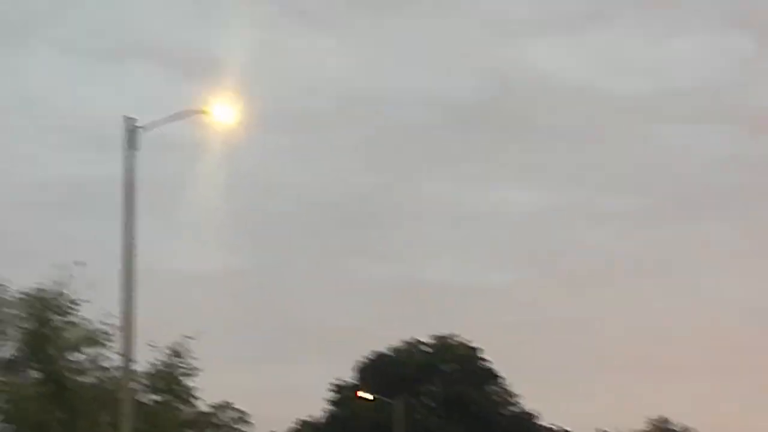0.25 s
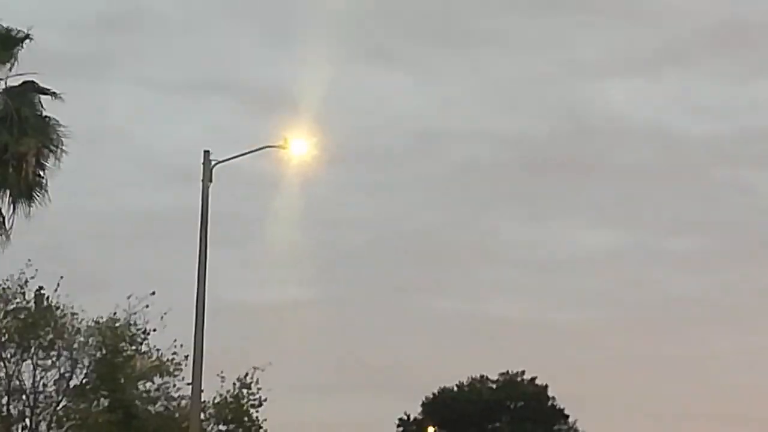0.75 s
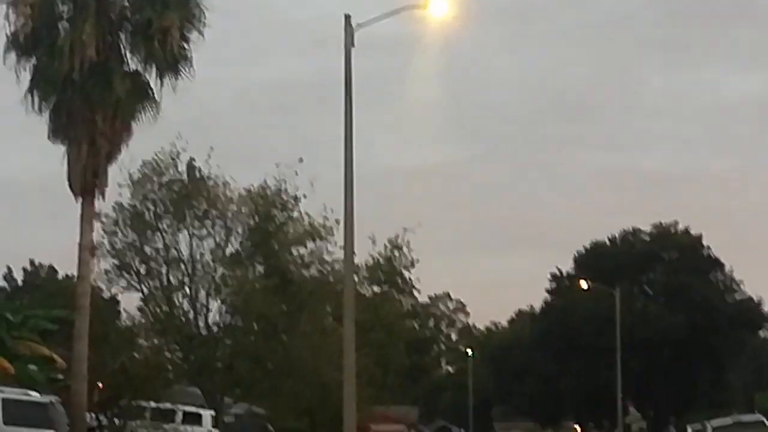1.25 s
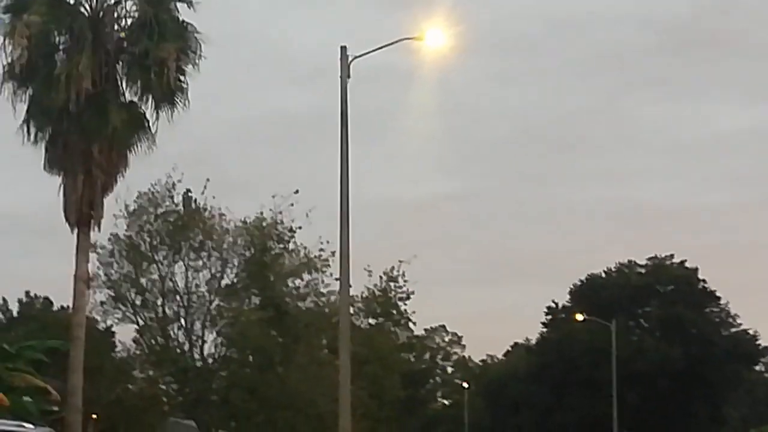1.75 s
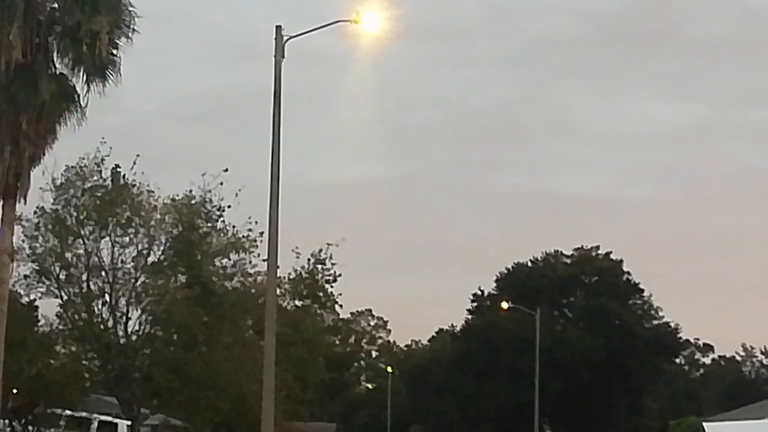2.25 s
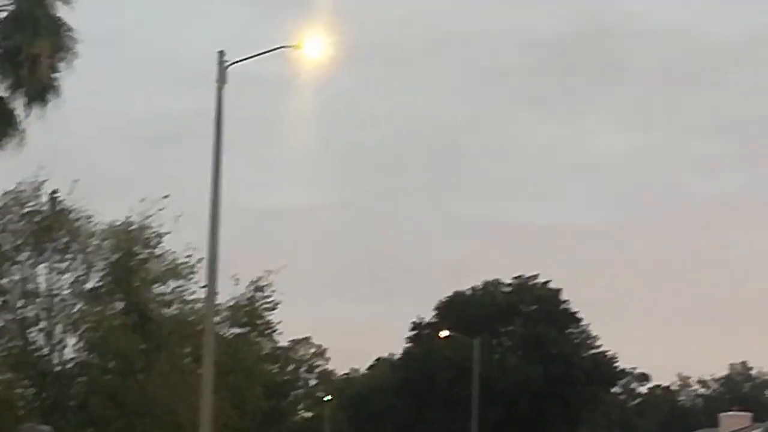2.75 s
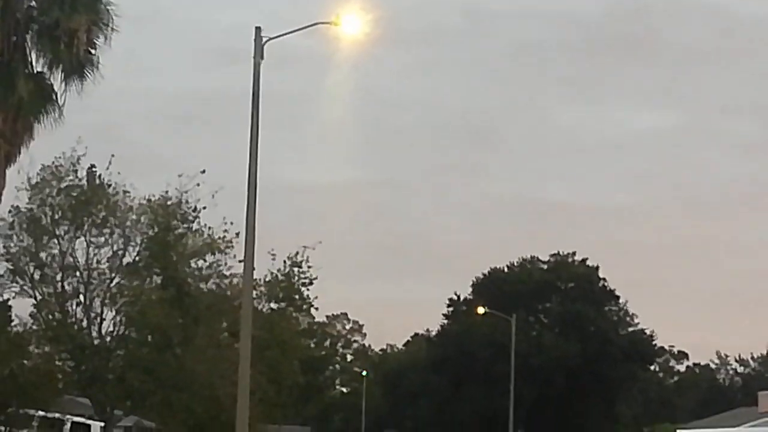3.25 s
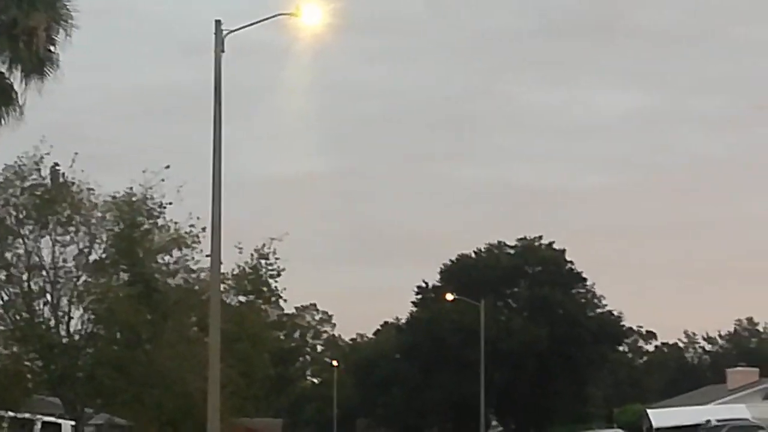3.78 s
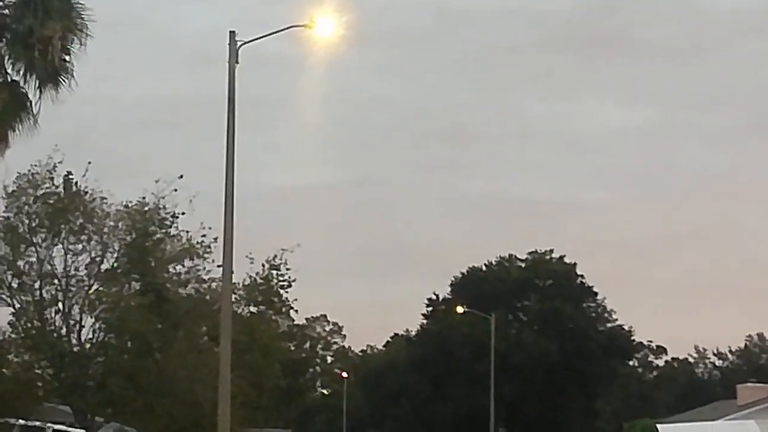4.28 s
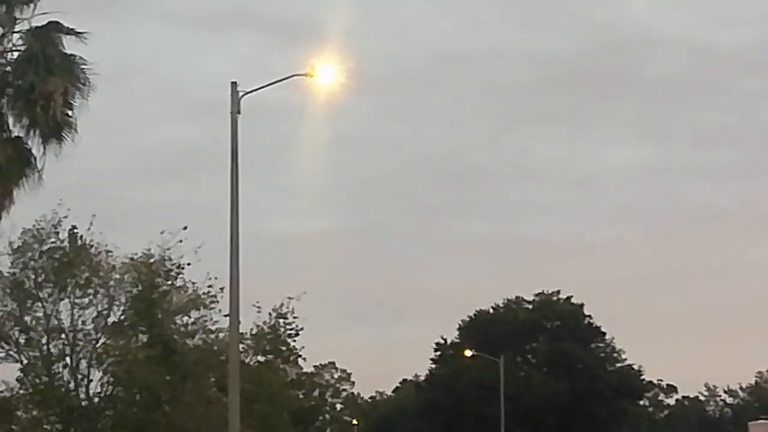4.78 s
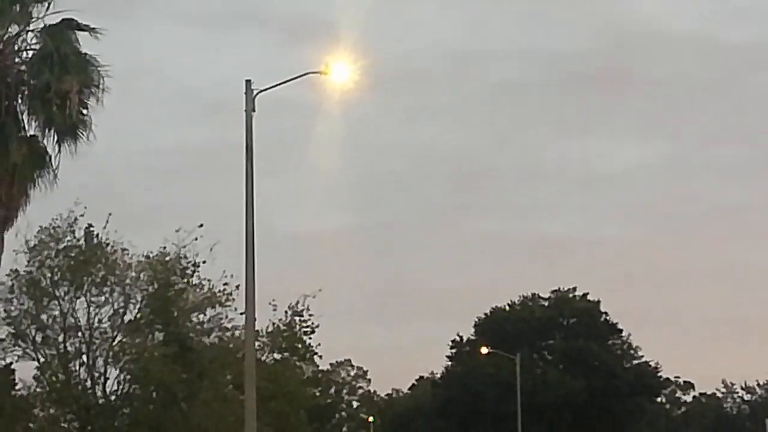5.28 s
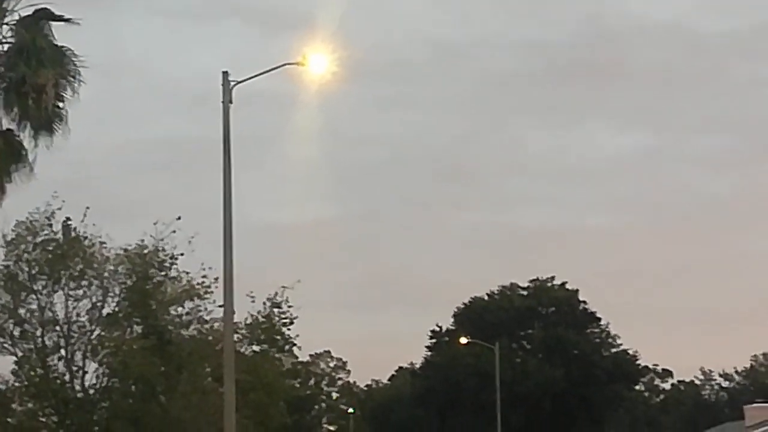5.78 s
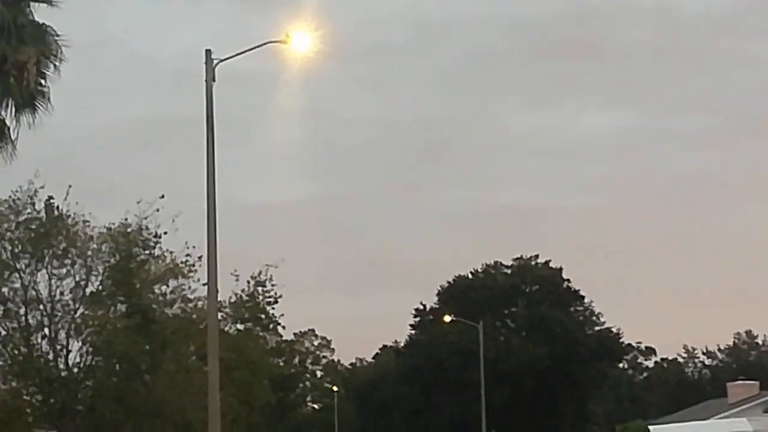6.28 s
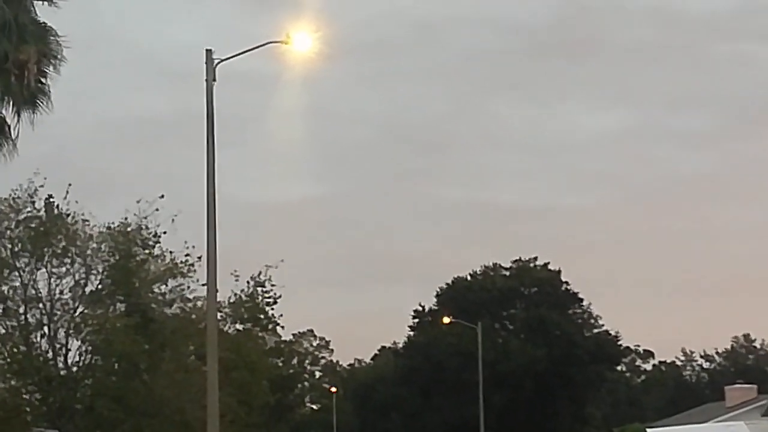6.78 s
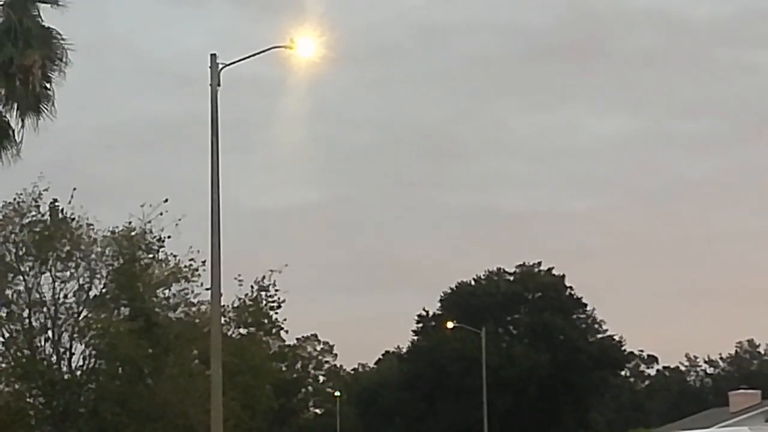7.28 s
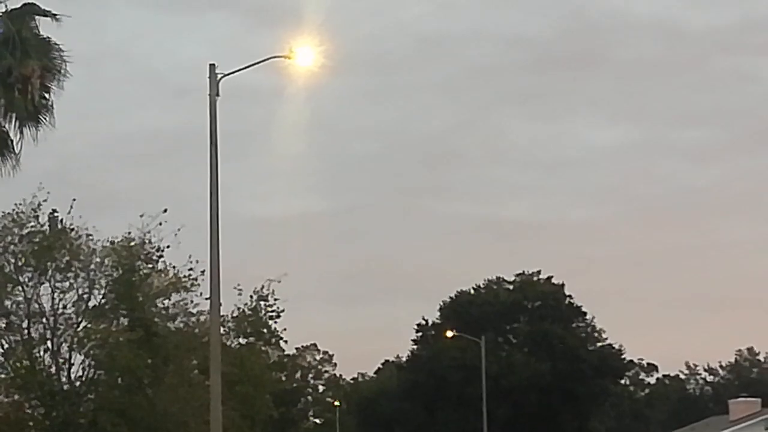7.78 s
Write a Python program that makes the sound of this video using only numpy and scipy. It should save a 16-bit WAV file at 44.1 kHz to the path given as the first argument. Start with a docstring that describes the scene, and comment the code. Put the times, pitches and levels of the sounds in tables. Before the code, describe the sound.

Overlapping raspy, whistling bird screeches come in bursts outdoors, with pauses of low traffic rumble, soft microphone thumps, and a faint sinking squeal.

```python
"""Several birds screech over one another from the trees of a quiet street at dawn, in three bouts.
Each call flicks up, then sags from whistle to rasp: syrinx harmonics and half-harmonics, then noisy bands.
Hoarse rasps of filtered noise lie beneath; scattered and single delayed echoes come from trees and houses.
Far off, shaped noise makes traffic hum, and a wavering tone with faint partials squeals.
The hand-held camera creaks as uneven slips ring its case, and bumps as bursts of low noise."""
import sys
import numpy as np
from scipy import signal
from scipy.fft import rfft, irfft, next_fast_len
from scipy.io import wavfile

SR = 44100
rng = np.random.default_rng(int(sys.argv[2]) if len(sys.argv) > 2 else 0)


def master(y):
    """Save y as 16-bit WAV."""
    cut = np.clip(np.atleast_2d(y).T, -1, 1)
    pcm = np.round(cut * 32767)  # scale
    wavfile.write(sys.argv[1], SR, pcm.astype(np.int16))


N = 354556  # length of the scene in samples
HZ = np.fft.rfftfreq(N, 1 / SR)

# the pitch flicks up to its top: duration in s, depth in log pitch
FLICK_S, FLICK_DEPTH = 0.04, 0.13
WHISTLE_RISE_DB_PER_S, OVERTONE_FADE_DB_PER_S = 83, 49
# the rasp is an arch: peak as a share of the call, and how far its level differs at start and end
RASP_PEAK, RASP_START_DB, RASP_END_DB = 0.53, -10.5, -7.5
# jitter as shares of the pitch: the voice frays toward its end
JITTER_SLOW, JITTER_FAST, JITTER_GROWTH = 0.00296, 0.0038, 0.0088
ATTACK_S, ATTACK_DB = 0.029, -10  # each call starts softly and opens up
# the birds sit close together to the left, so the left microphone hears them first
BIRD_LEAD_MS, PERCH_SPREAD_MS = 0.52, 0.015
# resonance of throat and beak, relative: frequency_hz, level_db
THROAT_RESPONSE = [(700, -30), (1600, -10.5), (2300, 3), (3100, 20), (4200, 13), (5100, 10), (6600, 2),
                   (7900, -9.5), (8800, -12), (10000, -20.5), (13000, -41.5), (16000, -53)]
# spectrum of the rasp, relative: frequency_hz, level_db
RASP_COLOUR = [(600, -22.5), (1500, -14), (2300, -1.5), (3000, 11.5), (3900, 12), (5000, 2.5), (7000, 1.5),
               (8100, -3), (8800, -5.5), (10000, -28), (13000, -23), (16000, -48)]


def screech(start, length, top_hz, sag, settle_s, whistle_db, peak_s, fade_db_per_s,
            overtones_db, rasp_db, half_db, pan_db,
            flutter_db=1.5, bright_db=-3, throb_db=0.3, hiss=0.55, swell_db=4.5,
            whistle_flutter_db=3.0, skirt_hz=150):
    """Subharmonic voicing: strong and weak syrinx cycles give lines with ragged skirts, over a little hiss."""
    t = sample_times(length)
    n, age = len(t), t / length

    # pitch
    flick = FLICK_DEPTH * np.maximum(1 - t / FLICK_S, 0) ** 2
    droop = sag * settle_s * (1 - np.exp(-np.maximum(t - FLICK_S, 0) / settle_s))
    hz = top_hz * np.exp(-flick - droop)
    jitter = JITTER_SLOW * wander(n, 45.5) + (JITTER_FAST + JITTER_GROWTH * age) * wander(n, 410)
    phase = 2 * np.pi * np.cumsum(hz * (1 + jitter)) / SR

    # levels
    below_peak_db = np.maximum(WHISTLE_RISE_DB_PER_S * (peak_s - t), fade_db_per_s * (t - peak_s))
    whistle_gain = amp(whistle_db - below_peak_db)
    overtone_gain = amp(overtones_db - OVERTONE_FADE_DB_PER_S * t)
    before_peak = np.maximum(1 - age / RASP_PEAK, 0)
    after_peak = np.maximum(age - RASP_PEAK, 0) / (1 - RASP_PEAK)
    rasp_gain = amp(rasp_db + RASP_START_DB * before_peak ** 2 + RASP_END_DB * after_peak ** 2)
    attack = amp(ATTACK_DB * np.maximum(1 - t / ATTACK_S, 0))

    def weight(k):
        """Period doubling: weak cycles add lines halfway between the harmonics."""
        return amp(half_db * (k % 1 > 0))

    def line(k):
        """Source and filter: the throat response sets the level of one line, which also flutters."""
        throat_db = read(THROAT_RESPONSE, k * hz)
        return weight(k) * amp(throat_db + flutter_db * wander(n, 52)) * np.sin(k * phase)

    def skirt(k):
        """Random modulation: irregular cycles spread a line into a band some hundred hertz wide."""
        in_step = wander(n, skirt_hz) * np.sin(k * phase)
        quarter_ahead = wander(n, skirt_hz) * np.cos(k * phase)
        return weight(k) * (in_step + quarter_ahead)

    orders = np.arange(2, 17) / 2  # multiples of the pitch: 1, 1.5, 2 ... 8
    # each overtone swells and fades slowly at random
    upper = unit(sum(line(k) * amp(swell_db * wander(n, 14)) for k in orders if k != 2))
    # the whistle is the strong second harmonic
    second = unit(amp(whistle_flutter_db * wander(n, 50)) * np.sin(2 * phase))
    # a harder push brightens the overtones along with the rasp
    voiced = whistle_gain * second + np.hypot(overtone_gain, amp(bright_db) * rasp_gain) * upper
    skirts = unit(sum(skirt(k) for k in orders))
    harsh = rasp_gain * colour(skirts + hiss * noise(n), RASP_COLOUR)

    throb = unit(amp(throb_db * wander(n, 120)))
    call = (voiced + harsh) * throb * attack * fade(t, 0.0046, 0.023)
    lead_ms = BIRD_LEAD_MS + PERCH_SPREAD_MS * rng.standard_normal()
    return start, place(call, lead_ms, pan_db)


HOARSE_RISE_S, HOARSE_FALL_S, HOARSE_FADE_DB_PER_S = 0.054, 0.064, 6.5
# spectrum of the toneless rasp, relative: frequency_hz, level_db
HOARSE_SPECTRUM = [(250, -3.5), (500, 1), (900, 3.5), (1300, 5), (1700, 10), (2200, 11), (2800, 10.5),
                   (4500, -60), (11000, -57)]


def hoarse(start, length, db):
    """Filtered turbulence: a toneless, grainy rasp starts quickly and slowly weakens."""
    t = sample_times(length)
    grain = noise(len(t)) * amp(0.6 * wander(len(t), 150))
    level = amp(db - HOARSE_FADE_DB_PER_S * t) * fade(t, HOARSE_RISE_S, HOARSE_FALL_S)
    return start, place(level * colour(grain, HOARSE_SPECTRUM), 0.1, 0)


# reverberation time of the street: frequency_hz, t60_s
STREET_DECAY = [(300, 0.45), (3000, 1), (6000, 0.87), (12000, 0.04)]


def street(x, gap_s=0.01346):
    """Diffuse reverberation: sparse echoes from trees and houses decay, the treble dying first."""
    signs = rng.choice([-1., 1.], (2, SR))
    chosen = rng.random((2, SR)) < 2500 / SR  # about 2500 echoes per second
    taps = signs * chosen * (np.arange(SR) > gap_s * SR)
    hz, t, bands = signal.stft(taps, SR, nperseg=256)
    decay = amp(-60 * t / read(STREET_DECAY, hz)[:, None])
    tail = signal.istft(bands * decay, SR, nperseg=256)[1]
    return signal.fftconvolve(x, tail / np.linalg.norm(tail[0]), axes=1)[:, :N]


# one row a call; the pitch is the fundamental, and the whistle sounds an octave above it:
# start_s, length_s, top_pitch_hz, sag_log_pitch_per_s, sag_settling_s,
# whistle_db, whistle_peak_s (after the start), whistle_fade_db_per_s,
# overtones_db, rasp_db, half_pitch_lines_db (relative), left_minus_right_db (before the microphone balance)
SCREECH_CALLS = [(-0.145, 0.31, 1831, 1.02, 0.59, -38, 0.083, 49, -52, -41.5, -7.5, 1),
                 (-0.037, 0.39, 1710, 0.3, 0.42, -43, 0.06, 71, -55, -50.5, -0.5, 2.5),
                 (0.423, 0.4, 1717, 0.9, 0.32, -37, 0.18, 32, -39, -38.5, -15.5, 6),
                 (0.621, 0.44, 1702, 0.55, 0.59, -35, 0.09, 76, -52, -42.5, -3.5, 3.5),
                 (1.139, 0.48, 1680, 1.23, 0.32, -37, 0.18, 67, -42.5, -40, -9.5, 5),
                 (1.437, 0.43, 1747, 0.58, 0.51, -32, 0.055, 40, -45, -47.5, -6.5, 9.5),
                 (1.628, 0.34, 2042, 0.73, 0.59, -42, 0.084, 56, -64, -42.5, 2.5, 3.5),
                 (1.748, 0.46, 1642, 0.71, 0.49, -36.5, 0.11, 33, -48, -43.5, -5, 7),
                 (2.094, 0.56, 1708, 0.75, 0.68, -33, 0.036, 72, -58, -48.5, -3, 5),
                 (2.46, 0.44, 1662, 1.01, 0.32, -43, 0.14, 59, -40.5, -45, -12.5, 2),
                 (2.696, 0.18, 1912, 0.76, 0.54, -39, 0.073, 43, -63, -44.5, -4, 21),
                 (3.282, 0.26, 1343, 0.77, 0.55, -62.5, 0.15, 49, -82, -75, 3, 0),
                 (4.028, 0.54, 1652, 0.36, 0.76, -39, 0.06, 9, -46.5, -43.5, -9, 6),
                 (4.306, 0.56, 1740, 0.94, 0.36, -41, 0.11, 30, -40, -40.5, -5, 3),
                 (4.635, 0.31, 1840, 0.045, 0.34, -37.5, 0.12, 54, -64, -50.5, -2, 8),
                 (4.892, 0.49, 1714, 0.76, 0.65, -33, 0.094, 61, -45.5, -46.5, -4.5, 5.5),
                 (5.162, 0.39, 1637, 0.65, 0.62, -47, 0.044, 42, -41, -40.5, -6, 4.5),
                 (5.319, 0.47, 1597, 0.57, 0.45, -41, 0.15, 60, -40, -41, -14, -1),
                 (5.634, 0.36, 1897, 0.96, 0.38, -38.5, 0.053, 43, -46, -56, -3.5, 4),
                 (6.509, 0.46, 1770, 1.04, 0.33, -39, 0.18, 59, -46, -46, -5, 3),
                 (6.751, 0.5, 1740, 0.68, 0.57, -34, 0.046, 48, -36, -42, -10.5, 4),
                 (6.863, 0.64, 1882, 0.95, 0.55, -36, 0.12, 24, -40.5, -42, -4.5, 3),
                 (7.053, 0.54, 1835, 0.97, 0.35, -34, 0.095, 30, -57, -40, -4.5, 7.5),
                 (7.442, 0.44, 1729, 0.75, 0.52, -32, 0.12, 72, -41, -44.5, -13, 8.5),
                 (7.639, 0.44, 1755, 0.73, 0.62, -32.5, 0.11, 41, -45, -42, -7, 7.5),
                 (7.747, 0.46, 1904, 1.1, 0.46, -37, 0.11, 50, -44, -50, -3, 10)]
# hoarse, low rasps under the calls: start_s, length_s, level_db
HOARSE_CALLS = [(1.689, 0.67, -52.5), (2.679, 0.26, -57.5), (4.242, 0.663, -53)]
# single echoes: delay_s, level_db (before walls_db is added)
WALL_ECHOES = [(0.022, -10), (0.049, -22), (0.082, -16.5), (.128, -17.5)]
# leaves and air colour the echoes: frequency_hz, gain_db
ECHO_BALANCE = [(1000, 2.5), (3200, 0.5), (4500, 2), (6500, 0.5), (10000, 1)]
# unequal response of the two microphone ports: frequency_hz, left_minus_right_db
PORT_BALANCE = [(100, 6), (700, -11), (1500, -7), (3200, -10), (4500, -7.5), (6000, 1.5), (7300, 5.5),
                (8500, 1), (15000, 19)]
# the case bends the treble on its way to the ports: frequency_hz, further_left_lead_rad
CASE_TURN = [(1500, 0), (2400, .6), (2850, -.4), (3220, 1.1), (3400, -.1), (3850, .1), (4100, -1),
             (4450, 0), (4720, -.5), (6000, 2), (6600, 3.2), (7200, 3.2), (7400, 1.3), (8000, 1),
             (8700, 2.1)]


def birds(scatter_db=-11, walls_db=-3.5):
    """Superposition: direct calls and rasps sum with their echoes, through two unlike microphone ports."""
    direct = np.zeros((2, N))
    for row in SCREECH_CALLS:
        add(direct, *screech(*row))
    for row in HOARSE_CALLS:
        add(direct, *hoarse(*row))

    echoes = amp(scatter_db) * street(direct)
    for delay, db in WALL_ECHOES:
        add(echoes, delay, amp(db + walls_db) * direct[::-1])  # left and right swap

    heard = rfft(direct) + rfft(echoes) * amp(read(ECHO_BALANCE, HZ))
    balance = amp(np.outer([0.5, -0.5], read(PORT_BALANCE, HZ)))
    balance = balance / np.sqrt(np.mean(balance ** 2, 0))
    turn = np.exp(1j * np.outer([0.5, -0.5], read(CASE_TURN, HZ)))
    return irfft(heard * turn * balance, N)


def squeal_tone(hz, waver, low_db, third_db=-32, fourth_db=-26, beating_db=4):
    """Additive synthesis: one strong line, an octave below and faint lines above, at rms 1."""
    n = len(hz)
    phase = np.pi * np.cumsum(hz * (1 + waver * wander(n, 128))) / SR  # phase of the octave below
    tone = np.sin(2 * phase) + amp(low_db) * np.sin(phase)
    tone += amp(third_db) * np.sin(3 * phase) + amp(fourth_db) * np.sin(4 * phase)
    # an unsteady pitch shakes the level too
    beats = unit(amp(beating_db * np.minimum(waver / 0.0056, 1) * wander(n, 54)))
    return beats * unit(tone)


WAVER_WEAK, WAVER_STRONG = 0.034, 0.011  # shares of the pitch: the squeal steadies as it grows loud
# the octave below breaks in, then fades
OCTAVE_FROM_S, OCTAVE_DB, OCTAVE_FADE_DB_PER_S = 5.83, -7, 18.5
PURE_WAVER, PURE_OCTAVE_DB, PURE_EDGE_S = 0.0024, -26, 0.028
# the sinking squeal: time_s, pitch_hz (strongest line), level_db
SQUEAL_PATH = [(5.22, 2480, -62), (5.45, 2086, -57.5), (5.8, 2030, -52.5), (5.87, 1967, -49.5),
               (5.97, 1896, -53), (6.04, 1925, -46), (6.32, 1956, -43.5), (6.43, 1834, -48.5),
               (6.6, 1900, -64)]
# the pure notes it settles on: start_s, length_s, pitch_hz, level_db
SETTLED_NOTES = [(6.637, 0.27, 1890, -46), (7.019, 0.088, 1880, -46.5)]


def squeal():
    """Frequency and amplitude modulation: a far squeal wavers as it sinks, then settles on pure notes."""
    out = np.zeros((2, N))
    t, hz, db = curves(SQUEAL_PATH)
    waver = np.interp(db, [-58, -47], [WAVER_WEAK, WAVER_STRONG])
    octave_db = OCTAVE_DB - OCTAVE_FADE_DB_PER_S * (t - OCTAVE_FROM_S)
    low_db = np.where(t > OCTAVE_FROM_S, octave_db, -35)
    add(out, t[0], amp(db) * squeal_tone(hz, waver, low_db) * fade(t, 0.025, 0.024))
    for start, length, note_hz, note_db in SETTLED_NOTES:
        t = sample_times(length)
        tone = squeal_tone(np.full(len(t), note_hz), PURE_WAVER, PURE_OCTAVE_DB)
        add(out, start, amp(note_db) * tone * fade(t, PURE_EDGE_S, PURE_EDGE_S))
    out = place(out[0], 0, -15.5)
    return out + amp(-13) * street(out)


# first snaps of the grip, as clicks that strike the case: time_s, level_db
SNAP_CLICKS = [(0.392, -52), (0.4114, -40), (0.4196, -49)]
# level of the run of small slips that follows: time_s, level_db
SLIP_LEVELS = [(.435, -51), (.47, -51), (.56, -50), (.64, -48.5), (.7, -53.5), (.85, -51.5), (.93, -54)]
# resonances of the case, before the hand muffles them: frequency_hz, level_db, t60_s
CASE_MODES = [(546, -10, 0.053), (856, -6.5, 0.023), (1100, -3.5, 0.025), (1185, -5, 0.047)]


def creak(slips_per_s=130, dull_hz=1500, order=6):
    """Stick-slip friction: uneven slips of the grip ring the modes of the case, muffled by the hand."""
    t, db = curves(SLIP_LEVELS)
    turns = np.cumsum(slips_per_s * np.exp(0.4 * wander(len(t), 150))) / SR
    slips = np.diff(np.floor(turns), prepend=0)  # one click at each whole turn
    clicks = np.zeros((2, N))
    add(clicks, t[0], slips * amp(db + 1.5 * wander(len(t), 100)))
    for s, snap_db in SNAP_CLICKS:
        add(clicks, s, amp([snap_db]))

    age = np.arange(2048) / SR
    ring = sum(amp(level - 60 * age / t60) * np.sin(2 * np.pi * hz * age) for hz, level, t60 in CASE_MODES)
    ring = low_pass(ring, dull_hz, order)
    return signal.oaconvolve(clicks, ring[None], axes=1)[:, :N] * amp([[-2], [2]])


# shifts of the hand: time_s (centre), level_db (before a 5.5 dB cut), spread_s (Gaussian), upper_edge_hz
HAND_BUMPS = [(0.034, -42.5, 0.031, 143), (0.14, -41, 0.052, 143), (0.986, -30.5, 0.0084, 156),
              (3.331, -36.5, 0.021, 133), (3.641, -41, 0.018, 146), (3.692, -28, 0.035, 150.1),
              (3.714, -29, 0.024, 263.8), (3.775, -32.5, 0.017, 172), (3.825, -34, 0.017, 163),
              (3.881, -33.5, 0.021, 204), (3.913, -32.5, 0.022, 109), (4.289, -33.5, 0.024, 163),
              (4.349, -27, 0.011, 233), (4.384, -29, 0.0083, 229), (4.442, -35, 0.016, 228),
              (4.532, -34.5, 0.0099, 240), (4.7, -37, 0.018, 158), (5.321, -35.5, 0.02, 169),
              (5.787, -39, 0.039, 122), (6.082, -35, 0.023, 177)]
# spectrum of a bump, relative: frequency_hz, level_db
HAND_COLOUR = [(20, -14.5), (50, -9), (95, -5.5), (160, -9), (300, -9)]


def bumps(order=6):
    """Handling noise: each shift of the hand sends a short, dull shudder into both microphones."""
    out = np.zeros((2, N))
    t = np.arange(-SR // 5, SR // 5) / SR
    for s, db, spread_s, edge_hz in HAND_BUMPS:
        shape = np.exp(-(t / spread_s) ** 2 / 2)
        shudder = shape * low_pass(colour(noise(len(t)), HAND_COLOUR), edge_hz, order)
        shudder *= amp(db - 5.5) * np.linalg.norm(shape) / np.linalg.norm(shudder)
        add(out, s + t[0], shudder)
    return out


WASH_DB, RUMBLE_DB = -61.5, -53  # mean levels
# spectrum of the faint morning wash, relative: frequency_hz, level_db
WASH_COLOUR = [(180, -65), (300, -16), (417, -2), (526, -5), (662, 5), (892, 4.5), (1070, -2.5),
               (1540, -2.5), (1900, -6.5), (3570, -8), (5850, -14.5), (6460, -16), (15500, -23.5)]
# spectrum of the far traffic, relative: frequency_hz, level_db
TRAFFIC_COLOUR = [(8.8, -24), (15, -8), (59, 0.5), (97, 0.5), (130, -3), (157, -7.5), (210, -10),
                  (258, -15), (358, -24), (384, -26), (400, -24.5), (520, -35), (880, -120)]
# likeness of left and right: frequency_hz, left_right_coherence (1 = identical)
LIKENESS = [(60, 1), (150, 1), (300, 0.96), (700, 0.2), (1500, .05), (15000, 0.031)]


def air():
    """Partly coherent noise: a low traffic rumble, alike left and right, lies under a faint wash."""
    likeness = np.clip(read(LIKENESS, HZ), -1, 1)
    a, b = rfft(rng.standard_normal((2, N)))
    pair = irfft(np.array([a, likeness * a + np.sqrt(1 - likeness ** 2) * b]), N)
    wash_gain = amp(WASH_DB + 0.1 * wander(N, 10.0)) * amp([[-1.5], [1.5]])
    rumble_gain = amp(RUMBLE_DB + 1.34 * wander(N, 11.0))
    return colour(pair, WASH_COLOUR) * wash_gain + colour(pair, TRAFFIC_COLOUR) * rumble_gain


# phase of left against right in the stereo widening: frequency_hz, left_lead_rad (negative = lag)
WIDENING_PHASE = [(15, -.1), (40, -.25), (90, -.47), (160, -.78), (280, -1.3), (700, -.6), (1500, 0)]


def widen(x):
    """Stereo widening: low sound leads or lags between left and right by a phase set per frequency."""
    return irfft(rfft(x) * np.exp(1j * np.outer([0.5, -0.5], read(WIDENING_PHASE, HZ))), N)


def amp(db):
    """Logarithmic level: decibels to gain."""
    return 10 ** (np.asarray(db) / 20)


def unit(x):
    """Effective value: scales to rms 1."""
    return x / np.sqrt(np.mean(x ** 2) + 1e-20)


def read(points, hz):
    """Logarithmic frequency: interpolates a spectrum along a log-frequency axis."""
    f, value = np.transpose(points)
    return np.interp(np.log(hz + 1), np.log(f + 1), value)


def curves(rows):
    """Linear interpolation: sample times of a table and its columns joined by straight lines."""
    s, *columns = np.transpose(rows)
    t = np.arange(round(s[0] * SR), round(s[-1] * SR)) / SR
    return [t] + [np.interp(t, s, c) for c in columns]


def sample_times(length):
    """Sampling: seconds since the start of a sound, sample by sample."""
    return np.arange(round(length * SR)) / SR


def add(mix, s, sound):
    """Superposition: mixes a sound in at time s, which may lie before zero."""
    at = round(s * SR)
    sound = sound[..., max(-at, 0):]
    part = mix[:, max(at, 0):][:, :sound.shape[-1]]
    part += sound[..., :part.shape[1]]


def colour(x, points):
    """Spectral shaping: filters x by a table of frequency and level, at rms 1."""
    n = next_fast_len(x.shape[-1])
    gain = amp(read(points, np.fft.rfftfreq(n, 1 / SR)))
    return unit(irfft(rfft(x, n) * gain, n)[..., :x.shape[-1]])


def low_pass(x, edge_hz, order):
    """Butterworth filtering: weakens what lies above an edge frequency."""
    return signal.sosfilt(signal.butter(order, edge_hz, fs=SR, output="sos"), x)


def noise(count):
    """White noise: a flat random spectrum from a stream of its own."""
    return np.random.default_rng(rng.integers(2 ** 32)).standard_normal(count)


def wander(count, hz):
    """Low-passed noise: smooth random motion up to a rate, at rms 1."""
    lead_in = SR // 10  # lets the filter settle
    return unit(low_pass(noise(count + lead_in), hz, 2)[lead_in:])


def fade(t, rise, fall):
    """Linear envelope: soft start and end."""
    return np.clip((t - t[0]) / rise, 0, 1) * np.clip((t[-1] - t) / fall, 0, 1)


def place(x, lead_ms, pan_db):
    """Time and level difference: a source to one side reaches one microphone first."""
    n = np.arange(len(x))
    delayed = np.interp(n - round(lead_ms * SR / 1000), n, x, 0, 0)
    return np.array([x, delayed]) * unit(amp([[pan_db / 2], [-pan_db / 2]]))


def scene():
    """Superposition: birds, far squeal, creaking grip, bumps and traffic sum to the street at dawn."""
    return birds() + squeal() + creak() + widen(bumps() + air())


def record(dry):
    """Band limiting: a linear-phase low-pass filter cuts the top treble."""
    edge_hz = 15600
    low_pass_taps = signal.firwin(1023, edge_hz, window=("kaiser", 9), fs=SR)
    return signal.oaconvolve(dry, low_pass_taps[None], "same")


dry = scene()
out = record(dry)
master(out)
```